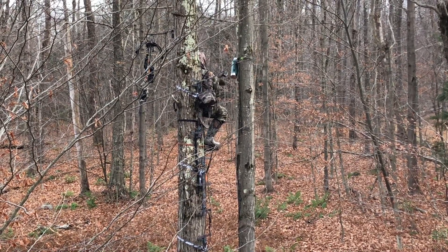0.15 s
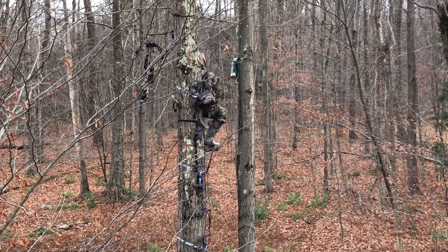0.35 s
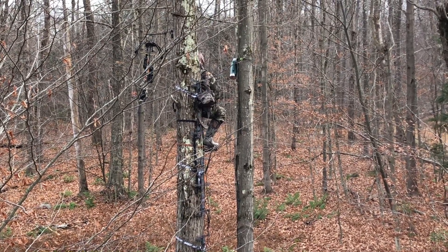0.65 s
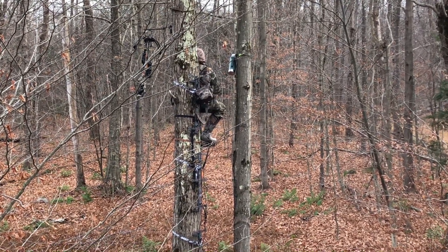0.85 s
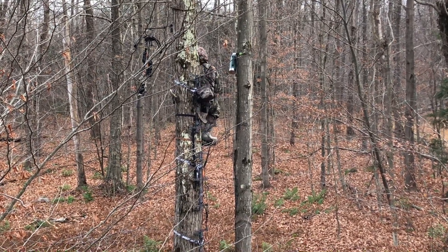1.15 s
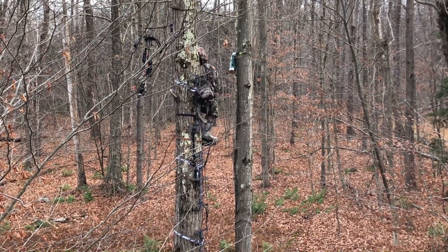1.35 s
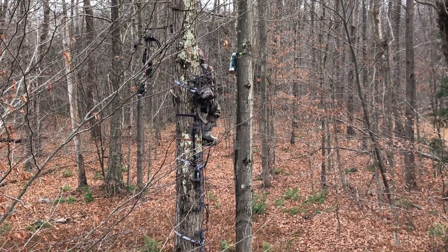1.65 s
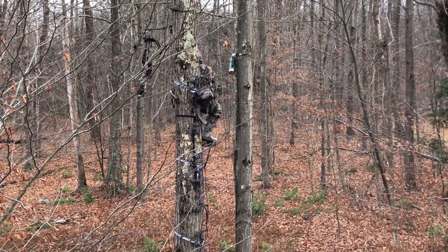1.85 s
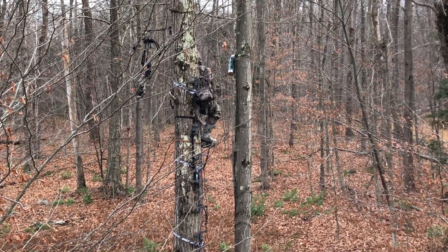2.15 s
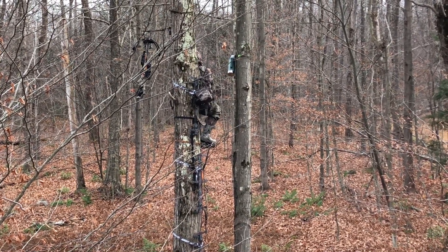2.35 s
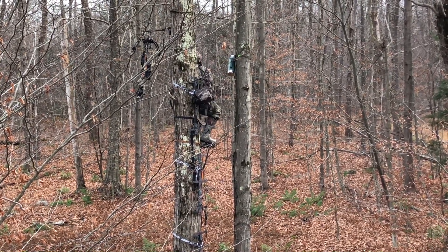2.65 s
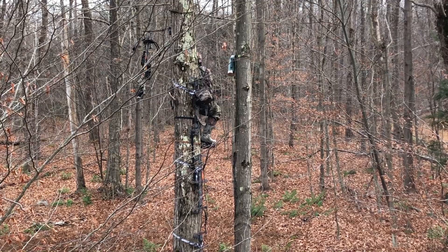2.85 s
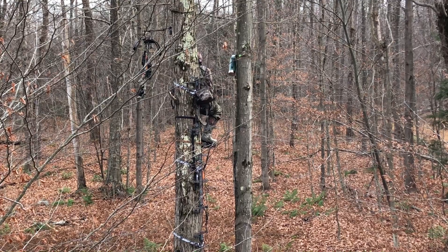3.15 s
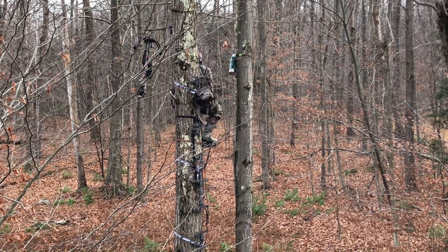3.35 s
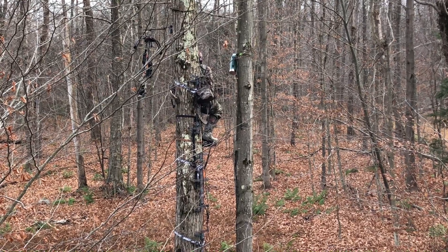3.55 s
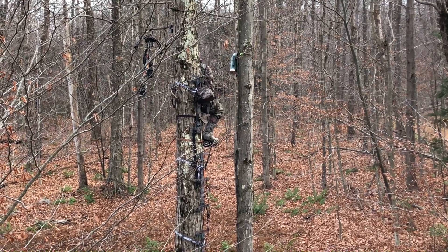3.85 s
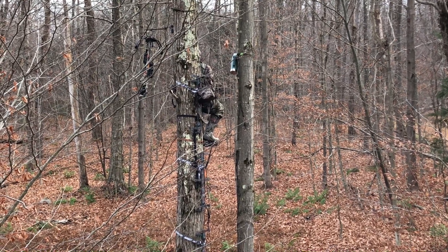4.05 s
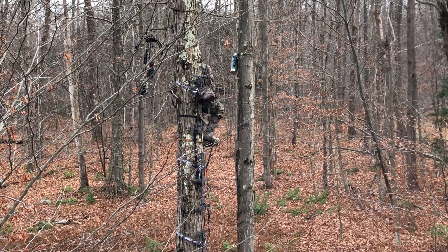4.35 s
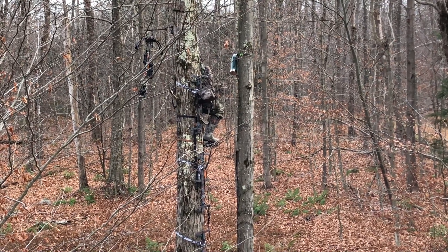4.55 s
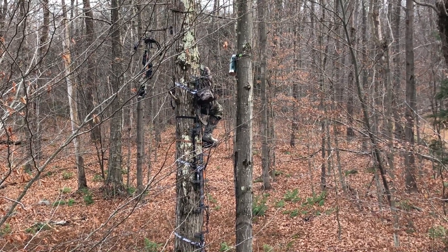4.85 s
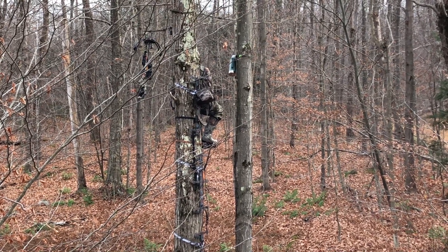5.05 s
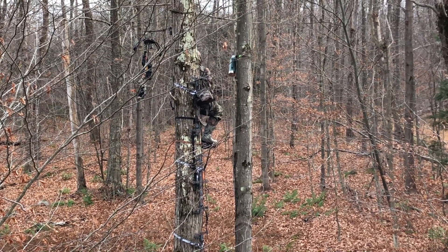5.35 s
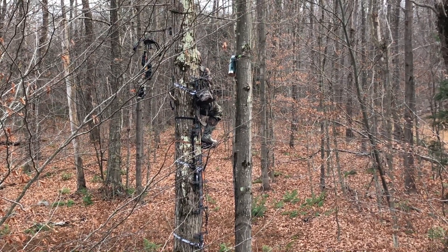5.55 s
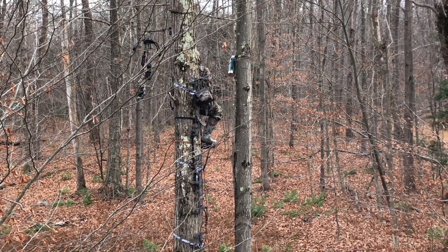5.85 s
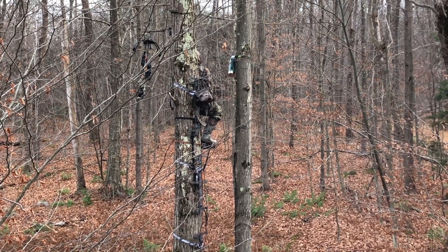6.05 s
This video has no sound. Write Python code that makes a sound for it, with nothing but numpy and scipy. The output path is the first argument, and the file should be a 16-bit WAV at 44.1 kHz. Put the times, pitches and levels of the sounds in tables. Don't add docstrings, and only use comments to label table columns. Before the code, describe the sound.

Dry, hard cracks and rattles of antler on antler, some way off in an open leafless forest, with soft wind buffeting the microphone.

```python
import sys
import numpy as np
from scipy import signal
from scipy.fft import rfft, irfft, next_fast_len
from scipy.io import wavfile
from scipy.ndimage import uniform_filter1d, map_coordinates

SR = 44100
rng = np.random.default_rng(int(sys.argv[2]) if len(sys.argv) > 2 else 0)


def field_ratio(decibels):
    return 10 ** (np.asarray(decibels, dtype=float) / 20)


def wrap_up_sound(samples):
    columns = np.atleast_2d(samples).T
    tamed = np.clip(columns, -1, 1)
    steps = np.round(tamed * 32767).astype(np.int16)
    wavfile.write(sys.argv[1], SR, steps)


N = 273861

# (frequency [Hz], level [dB])
HELD_MODES = [(1060, -2), (1450, 0.5), (2200, 1.5), (2900, 1.5), (3500, 0), (4350, 2), (5100, 0),
              (6300, 2.5), (7100, 2), (8800, -2.5)]
BELOW, ABOVE = 0.68, 1.3


def unit(x):
    return x / np.sqrt(np.mean(x ** 2, axis=-1, keepdims=True) + 1e-20)


def along(points, hz):
    f, *cols = np.transpose(points)
    return [np.interp(np.log(hz + 1), np.log(f + 1), c) for c in cols]


def wobble(size, rate_hz):
    knots = rng.standard_normal(int(size * rate_hz / SR) + 4)
    return map_coordinates(knots, [np.arange(size) * rate_hz / SR])


def coloured(spectrum, shape):
    size = next_fast_len(shape[-1])
    gain = field_ratio(along(spectrum, np.fft.rfftfreq(size, 1 / SR))[0])
    noise = irfft(rfft(rng.standard_normal(shape), size) * gain, size)
    return unit(noise[..., :shape[-1]])


def antlers():
    # (time [s], level [dB], beam ring [Hz], low weight [dB], brightness [dB])
    strokes = [(0.062, -23.5, 2020, -3, -7.5), (0.3328, -21.5, 1620, -9.5, 2), (0.85, -15.5, 1385, -16, 1),
               (1.0177, -27.5, 1440, 2, -1), (1.2004, -28.5, 1796, 4, -7), (1.647, -27.5, 1510, 18, 7.5),
               (1.8886, -28, 1710, -5.5, 4), (2.1358, -21, 1930, -13, -1.5), (2.4366, -22.5, 1910, -7, -10),
               (2.7543, -26.5, 1700, -2, -7.5), (2.9993, -28.5, 1417, -8, -4), (3.2023, -30, 1580, -5, 5.5),
               (3.416, -25, 1490, -18.5, -4.5), (3.9056, -24.5, 1520, 9, -3.5),
               (4.0808, -25, 1035, -13.5, 2), (4.2725, -26, 2220, -13, -2), (4.4817, -31, 1940, -4, -8),
               (4.8408, -34.5, 1336, 8, 1), (5.0455, -27.5, 1510, 12.5, -6.5), (5.2475, -25, 1850, -3, 10),
               (5.4512, -26.5, 1156, -0.5, -3), (5.6623, -29, 1545, -5, -3), (5.8459, -22.5, 1156, -4, -6),
               (6.0616, -28.5, 1830, -4, -3)]
    grazes = [(0.0453, -49, 2200, 2, 0), (0.059, -29, 2125, -7, -22), (0.3232, -43.5, 2100, -2, 1),
              (0.742, -42, 1450, -5, -4), (1.174, -39, 1820, -17, -1), (1.1829, -32.5, 1540, 1, -7),
              (1.386, -35.5, 790, -10, -16), (1.8815, -39.5, 1870, -5, -12), (2.4296, -27, 1953, -6, -6),
              (2.7303, -34, 970, -2, -11), (2.987, -43, 2000, 2, -1), (3.1544, -34.5, 1910, -7, -6),
              (3.1801, -36, 2300, -7, -4), (3.1959, -36.5, 1115, 2, -29), (3.4086, -30, 1300, -11, -16),
              (3.8986, -30.5, 1540, 3.5, 2), (4.2545, -29, 2186, 4, 2), (4.8275, -35.5, 890, -4, 4),
              (5.026, -42, 1170, 6, -5), (5.239, -38, 1920, -1, -11), (5.2444, -26, 1670, -15, -12),
              (5.4158, -39, 1480, 9, -8), (5.8181, -36.5, 1370, 0, 0), (6.007, -42, 1070, 3, -4)]
    rebounds = [(0.076, -28.5, 1460, -4.5, -2), (0.3417, -22.5, 1810, -3, -12),
                (0.8653, -22, 1460, -2.5, -4), (1.0469, -33.5, 880, 3, 14), (1.434, -38.5, 2240, -7, 0),
                (1.652, -36, 1560, 25, -2), (2.137, -22, 1520, -3.5, -3), (2.1602, -31, 2040, -19, 2),
                (2.172, -30.5, 2060, -7, 2), (2.44, -33.5, 770, 13, -4), (2.766, -36, 1430, -23, 4),
                (1.91, -37.5, 806, 17, -14), (3.2364, -33, 1120, -8, 0), (3.4334, -30.5, 1500, 4, 5),
                (3.665, -34, 1086, 0, -15), (4.301, -32, 1610, -7, -3), (4.3189, -26, 1390, -5, -7),
                (4.503, -33, 2187, 3, 3), (5.083, -35.5, 1140, 16, -22), (5.2522, -27, 1530, -4, 17),
                (5.4878, -36.5, 1200, 1, -5), (5.708, -36, 2090, 1, -17), (3.679, -42.5, 890, 5, -12),
                (1.449, -45, 2180, -16, 9)]
    further_contacts = [(0.9025, -30, 2000, -2, -16), (1.1383, -30.5, 1010, -2, -1.5), (1.207, -30.5, 860, 1, -2.5),
                        (1.272, -40, 1060, -10, -4), (1.399, -32.5, 854, -3.5, -1), (1.7253, -44, 2200, 7, -4),
                        (2.796, -42, 1500, -9, -1), (2.8382, -40.5, 2040, 0, -10), (2.9153, -33.5, 1580, -7, -6),
                        (2.971, -44, 1280, 2, -1), (3.478, -31.5, 1320, -9, -2), (3.618, -34, 1500, 0, -3.5),
                        (3.9096, -32.5, 778, 10, 2.5), (4.036, -39, 1870, 0, -1), (4.1183, -32.5, 1550, 5, -1),
                        (4.1243, -33, 1365, -4, -13), (4.541, -31, 2130, 2.5, 6), (4.6062, -32.5, 883, 0, 4.5),
                        (4.7042, -35, 1356, 4, -9), (5.5144, -34.5, 1700, 5, -9), (5.9214, -40, 2056, 17, -18),
                        (6.0186, -31, 1090, -1, 11.5), (6.12, -34, 1851, 4.5, 1), (1.03, -39, 947, 9, -8),
                        (1.664, -41, 1010, 16, -10), (1.687, -41.5, 1050, 5, 0), (3.035, -39.5, 1500, 2, -5),
                        (3.26, -41.5, 1050, 8, -8), (4.131, -35.5, 1430, 8, -10), (5.05, -34.5, 855, 14, -18)]
    unheard = (.66, -21, 1500, -3, -2)
    # (from [s], tine ring [Hz], freed mode [Hz], its lift [dB], share to the woods [dB])
    grip_changes = [(0.02, 3930, 4470, 6.5, -1.5), (0.3, 3800, 7240, 1, 0.5), (0.82, 3680, 4600, 5, -3.5),
                    (0.99, 3330, 8950, 5, 2), (1.11, 3900, 6980, -6, 1), (1.35, 6900, 3400, 16, 3),
                    (1.6, 3220, 2260, 4, -1.5), (1.84, 6700, 3780, 9, 4), (2.1, 3200, 6300, 7, 2.5),
                    (2.39, 3400, 6467, 7, 3), (2.69, 5730, 7040, 7, 3), (2.95, 2840, 5980, 15, 2),
                    (3.11, 4650, 3610, 8, 2), (3.37, 4760, 6000, 4, 1), (3.58, 4705, 3620, 17, 2.5),
                    (3.86, 3900, 6840, 14, 1.5), (4.06, 3420, 6890, -7, 1.5), (4.44, 3670, 4241, 6, 4),
                    (4.79, 3852, 6406, 6, 2), (4.99, 3170, 7300, 6, -0.5), (5.2, 6070, 3700, 7, 2.5),
                    (5.38, 3700, 4100, 3, 1.5), (5.78, 3330, 4069, 3, 1), (5.97, 3700, 1900, 1, 4)]
    # (from [s], main mode [Hz], second mode [Hz], damped [Hz], lift
    # [dB])
    tine_meetings = [(0.06, 4330, 6600, 2610, 7), (0.331, 3800, 5510, 4550, 4.5),
                     (0.848, 3500, 5540, 4800, 8), (0.864, 6310, 4600, 6950, 8),
                     (1.016, 4760, 8000, 6540, 6.5), (1.045, 3700, 8840, 8320, -1),
                     (1.137, 3500, 7280, 2670, 3), (1.181, 8950, 5200, 4380, 5.0),
                     (1.198, 4300, 7000, 5520, 3), (1.384, 3360, 6540, 2460, 9), (1.397, 7030, 3540, 7300, 4),
                     (1.645, 7060, 5870, 3900, 9), (1.887, 3800, 6700, 4830, 6.5),
                     (2.134, 3200, 7520, 2520, 1), (2.435, 4390, 6060, 2460, 4.5),
                     (2.752, 7020, 5960, 4860, 7), (2.914, 3470, 4160, 7760, 5),
                     (2.997, 5930, 2976, 5080, 10.0), (3.153, 4430, 3990, 7200, 8),
                     (3.178, 4500, 9330, 5420, 0), (3.2, 3640, 6820, 8860, 8), (3.235, 4960, 8100, 2860, 4.0),
                     (3.414, 7900, 6000, 7000, 4), (3.476, 4940, 3710, 6880, 3),
                     (3.616, 4830, 3520, 5770, 13),
                     (3.663, 3600, 4820, 2880, 5.0), (3.904, 3870, 7040, 4735, 2),
                   (4.079, 3070, 8010, 2350, 0), (4.116, 3040, 5730, 5285, 8), (4.253, 6100, 8150, 9040, 1),
                   (4.271, 5600, 9020, 3050, 6), (4.299, 9000, 5550, 7610, 5.0),
                   (4.317, 3280, 8900, 5030, 5), (4.48, 3900, 8030, 3060, 7),
                   (4.501, 5900, 6960, 7740, 3.5), (4.539, 3460, 9000, 2940, 4.0),
                   (4.604, 2890, 5700, 4170, 2), (4.702, 4290, 3330, 5900, 9), (4.826, 3740, 6400, 3300, 2),
                   (5.043, 7470, 6460, 3730, 5), (5.245, 6200, 8500, 5040, 1), (5.449, 3400, 8260, 9320, 0),
                   (5.486, 8120, 7450, 2420, 4.5), (5.512, 6410, 3930, 5500, 1),
                   (5.66, 3930, 6010, 2820, 6), (5.816, 5490, 6260, 5030, 7.0),
                   (5.844, 4030, 8300, 5250, 1), (6.017, 6500, 3850, 2330, 3), (6.06, 9300, 3740, 5230, 5),
                   (6.118, 8100, 3630, 5500, 4)]
    join_s = 0.7545
    spot_db = 0.9
    glance = 0.018

    rows = np.vstack([strokes, grazes, rebounds, further_contacts, [unheard]])
    held, met = np.array(grip_changes), np.array(tine_meetings)
    grips = held[np.searchsorted(held[1:, 0], rows[:, 0])]
    tines = met[np.searchsorted(met[1:, 0], rows[:, 0] + 0.002)]
    spots = spot_db * rng.standard_normal((len(rows), len(HELD_MODES)))
    db = rows[:, 1:2]

    scatter = field_ratio(21.0 + grips[:, 4:] - glance * (db - db.mean())) * woods(count=len(rows))
    facing = bodies(rows, grips, tines, spots, beam=2.6, beam_width_hz=107, tine=0.96, tine_width_hz=120,
                    grip=0.89, weight=0.98, meeting=1.08)
    direct = signal.fftconvolve(blows(db), facing, axes=1)
    size = direct.shape[1]
    bending = knocks(rows, size)
    sent = field_ratio(-31.5) * bending
    sent[:, :1024] += bodies(rows, grips, tines, spots, beam=0.21, beam_width_hz=85, tine=0.25,
                             tine_width_hz=110, grip=0.5, weight=0.7, meeting=0.85)
    heard = signal.fftconvolve(scatter, sent, axes=1)
    heard[:, :size] += field_ratio(5.5) * direct + bending + rings(rows, tines, size)

    passages = np.zeros((2, N + heard.shape[1]))
    second = rows[:, 0] > join_s
    second[-1] = True
    for s, part, sound in zip(rows[:, 0], second, heard):
        passages[int(part), round(s * SR) - 20:][:len(sound)] += sound
    return np.where(np.arange(N) < join_s * SR, passages[0, :N], passages[1, :N])


def blows(db):
    strike_gain, grows = 1.7, 0.65
    t = np.arange(1300) / SR
    first = np.exp(-((t - rng.uniform(0.0004, 0.001, db.shape)) / 2.2e-5) ** 2)
    strike = strike_gain * field_ratio(grows * (db - db.mean())) * first
    bursts = field_ratio(3.1 * rng.standard_normal((len(db), len(t) // 20))).repeat(20, axis=1)
    grit = np.tanh(rng.standard_normal((len(db), len(t)))) * bursts
    decay = field_ratio(-60 * t / 0.025) + 0.17 * field_ratio(-60 * t / 0.13)
    chatter = grit * (1 - np.exp(-t / 0.00048)) * decay
    return strike + 9.8 * chatter / np.linalg.norm(chatter, axis=1, keepdims=True)


def bodies(rows, grips, tines, spots, beam, beam_width_hz, tine, tine_width_hz, grip, weight, meeting):
    # (frequency [Hz], spectrum level [dB per Hz])
    bone = [(300, -17.5), (600, -11), (900, -3.5), (1500, -2.5), (2500, -3), (3500, -2.5), (5500, -3.5),
            (8000, -7), (12000, -15.5), (16000, -21)]
    _, db, beam_hz, low_db, bright_db = rows.T[:, :, None]
    _, tine_hz, freed_hz, freed_db, _ = grips.T[:, :, None]
    _, main_hz, second_hz, damped_hz, lift_db = tines.T[:, :, None]
    hz = np.fft.rfftfreq(2048, 1 / SR)

    def peak(centre_hz, width_hz):
        return 1 / (1 + ((hz - centre_hz) / width_hz) ** 2)

    low = 1 / (1 + (hz / 2300) ** 4)
    high = 1 / (1 + (6200 / (hz + 1)) ** 4)
    met_db = lift_db * (peak(main_hz, 180) + 0.63 * peak(second_hz, 190)) - 7 * peak(damped_hz, 150)
    modes_db = 0.34 * freed_db * peak(freed_hz, 190)
    for (mode_hz, level_db), spot in zip(HELD_MODES, spots.T):
        modes_db = modes_db + (level_db + spot[:, None]) * peak(mode_hz, 220)
    colour_db = along(bone, hz)[0] + weight * low * low_db + 1.1 * high * bright_db
    gain = field_ratio(colour_db + grip * modes_db + meeting * met_db)

    neighbours = peak(BELOW * beam_hz, beam_width_hz) + peak(ABOVE * beam_hz, beam_width_hz)
    beam_ring = np.sqrt(peak(beam_hz, beam_width_hz) + 0.1 * neighbours)
    tine_ring = np.sqrt(peak(tine_hz, tine_width_hz))
    gain = gain * (1 + beam * field_ratio(0.067 * low_db) * beam_ring + tine * tine_ring)

    cepstrum = irfft(np.log(gain))
    cepstrum[:, 1:1024] *= 2
    cepstrum[:, 1025:] = 0
    response = irfft(np.exp(rfft(cepstrum)))[:, :1024]
    return field_ratio(db) * response / np.linalg.norm(response, axis=1, keepdims=True)


def knocks(rows, size):
    _, db, beam_hz, low_db, _ = rows.T[:, :, None]
    t = np.arange(size) / SR

    def mode(ratio, t60_s):
        return np.sin(2 * np.pi * beam_hz * ratio * t) * field_ratio(-60 * t / t60_s)

    modes = mode(1, 0.073)
    modes = modes + field_ratio(rng.normal(-4.5, 0.7, db.shape)) * mode(BELOW, 0.07)
    modes = modes + field_ratio(rng.normal(-10, 4.7, db.shape)) * mode(ABOVE, 0.042)
    return field_ratio(db - 3.5 + 0.63 * np.minimum(low_db, 12)) * (1 - np.exp(-t / 0.00061)) * modes


def rings(rows, tines, size):
    _, db, _, low_db, _ = rows.T[:, :, None]
    _, main_hz, second_hz, _, lift_db = tines.T[:, :, None]
    t = np.arange(size) / SR
    pair = np.sin(2 * np.pi * main_hz * t) + 0.7 * np.sin(2 * np.pi * second_hz * t) * field_ratio(-60 * t / 0.06)
    envelope = (1 - np.exp(-(t / 0.0012) ** 2)) * field_ratio(-60 * t / 0.028)
    return field_ratio(db - 13 + 1.1 * lift_db - 0.45 * low_db) * envelope * pair


def woods(count):
    # (frequency [Hz], early t60 [s], late t60 [s])
    decay_times = [(484, 0.38, 0.45), (1500, 0.28, 2.18), (3700, 0.35, 1.1), (7760, 0.26, 0.54),
                   (16000, 0.087, 0.34)]
    hz, t, z = signal.stft(rng.standard_normal((count, 30000)), SR, nperseg=256)
    early_s, late_s = along(decay_times, hz[:, None])
    lumps = uniform_filter1d(rng.standard_normal(z.shape), size=10, axis=1)
    lumps = uniform_filter1d(lumps, size=3)
    trunks = field_ratio(18 * lumps * np.exp(-t / 0.58))
    decay = field_ratio(-60 * t / early_s) + field_ratio(-11.5) * field_ratio(-60 * t / late_s)
    tail = signal.istft(z * trunks * decay, SR, nperseg=256)[1]
    t = np.arange(tail.shape[1]) / SR
    ground = 0.071 * np.exp(-((t - 0.017) / 0.00057) ** 2)
    swell = 0.4 + (1 - np.exp(-(t / 0.02) ** 2)) + ground
    tail = tail * swell * (t > 0.003)
    return tail / np.sqrt(np.mean(np.sum(tail ** 2, axis=1)))


def wind():
    # (peak time [s], peak level [dB], half length [s])
    gusts = [(0.332, -55, 0.13), (0.863, -47, 0.11), (1.1, -43, 0.058), (1.158, -46, .04), (1.8, -57, 0.6),
             (2.4, -65, 0.1), (3.014, -46.5, 0.066), (3.197, -51, .05), (3.69, -51.5, 0.16),
             (3.928, -44, 0.059), (4.31, -51, .06), (4.48, -52, 0.066), (4.7, -48, .04), (5.186, -48, 0.2),
             (5.48, -44.5, 0.1), (5.686, -48, 0.092), (5.89, -42.5, 0.071), (6.09, -45, 0.11),
             (6.21, -51, 0.095)]
    # (time [s], peak level [dB], first pitch [Hz], last pitch [Hz], length [s])
    slaps = [(0.85, -39, 75, 58, 0.028), (1.0765, -32, 190, 90, 0.013), (1.0863, -25, 393, 39.8, .014),
             (1.1206, -33, 161, 70, 0.03), (1.152, -22, 610, 91, 0.00825), (1.174, -34, 190, 50, 0.01),
             (5.847, -33, 108, 84.5, 0.0085), (5.8775, -30, 370, 71, 0.0098)]
    # (frequency [Hz], spectrum level [dB per Hz])
    buffet = [(20, -16), (32, -16), (48, -4), (80, -4), (160, -1), (400, -16), (900, -46)]
    calm_db = -50.5
    s = np.arange(N) / SR
    strength = field_ratio(calm_db) + sum(field_ratio(db) * np.exp(-((s - at) / half) ** 2) for at, db, half in gusts)
    x = strength * unit(field_ratio(0.57 * wobble(N, 25)) * coloured(buffet, (N,)))
    for at, db, first_hz, last_hz, length_s in slaps:
        t = np.clip(s - at, 0, 1)
        glide = (first_hz - last_hz) * length_s / 2 * (1 - np.exp(-2 * t / length_s))
        turns = last_hz * t + glide
        pulse = t / length_s * np.exp(-(t / length_s) ** 2 * 0.97)
        x = x - field_ratio(db + 10.5) * pulse * np.cos(2 * np.pi * turns)
    return x


def background():
    # (frequency [Hz], spectrum level [dB per Hz])
    far = [(18, -48), (30, -39), (100, -8.5), (132, 3), (165, 0), (282, -3), (590, -13), (888, -15.5),
           (1500, -41), (3300, -120)]
    hiss = [(300, 4), (1500, 8), (5000, 0), (9000, -9), (16000, -24)]
    flutter_db = 1.5 * wobble(N, 3.72) + 1.23 * wobble(N, 16)
    rumble = field_ratio(-44.5 + flutter_db) * coloured(far, (N,))
    return rumble + field_ratio(-63) * coloured(hiss, (N,))


def scene():
    return (antlers() + wind() + background())[None]


def top_cut(x):
    return signal.sosfilt(signal.butter(12, 16820, fs=SR, output="sos"), x)


def record(dry):
    # (time [s], gain [0-1])
    splice = [(.744, 0.46), (.7545, 0), (.79, 0.24), (.8, 0.4)]
    top_hz = 15900
    faded = dry * np.interp(np.arange(N) / SR, *np.transpose(splice))
    hz = np.fft.rfftfreq(N, 1 / SR)
    edge = field_ratio(-28 / (1 + np.exp((top_hz - hz) / 40))) * (hz < 16750)
    return top_cut(irfft(rfft(faded) * edge, N))


dry = scene()
out = record(dry)
wrap_up_sound(out)
```